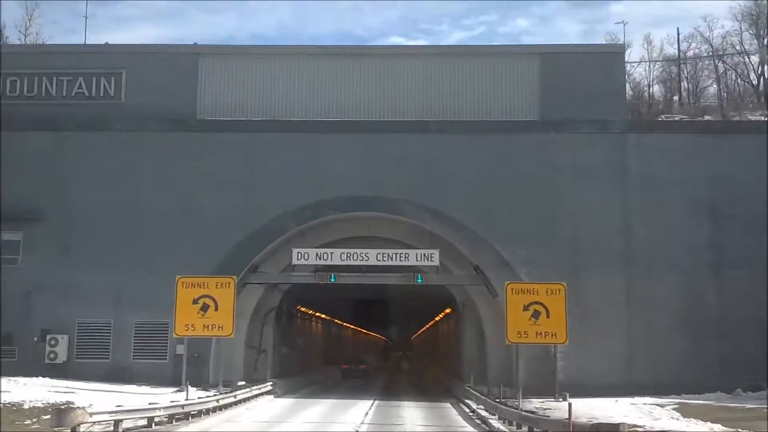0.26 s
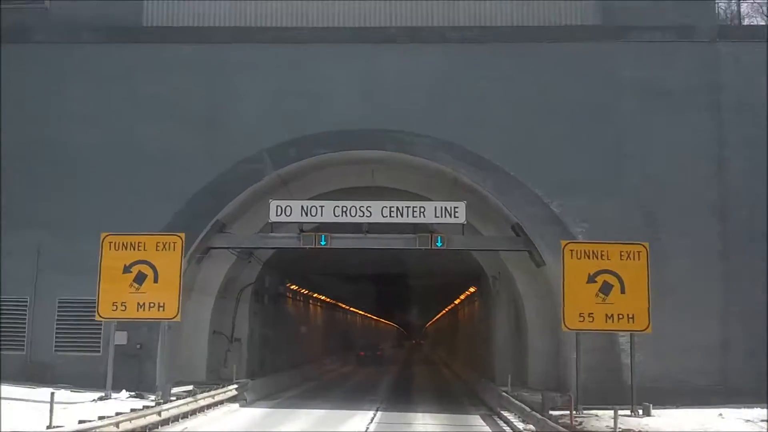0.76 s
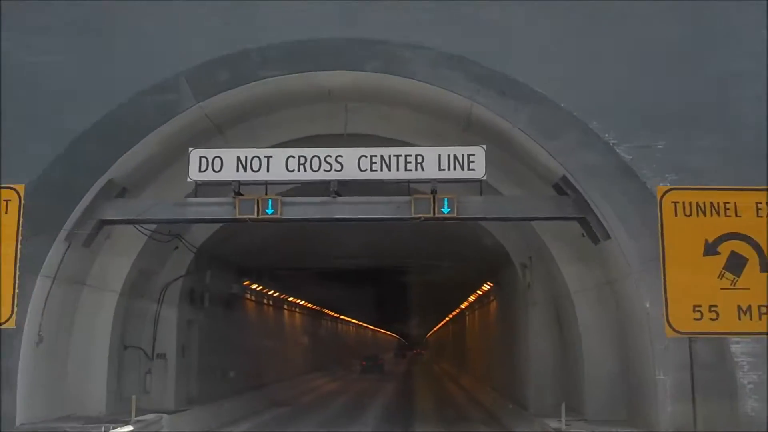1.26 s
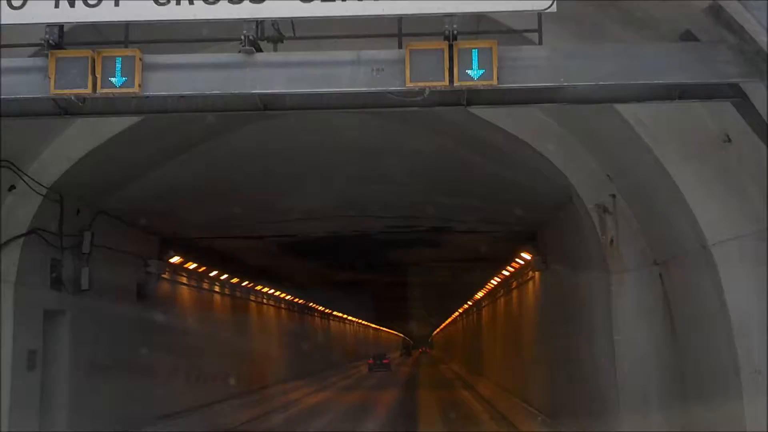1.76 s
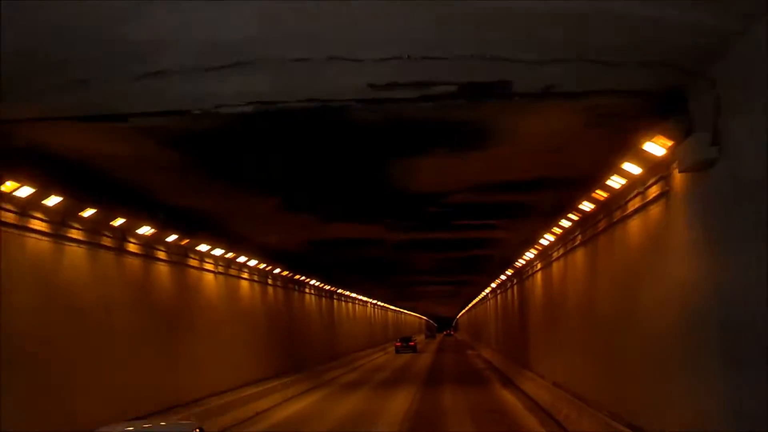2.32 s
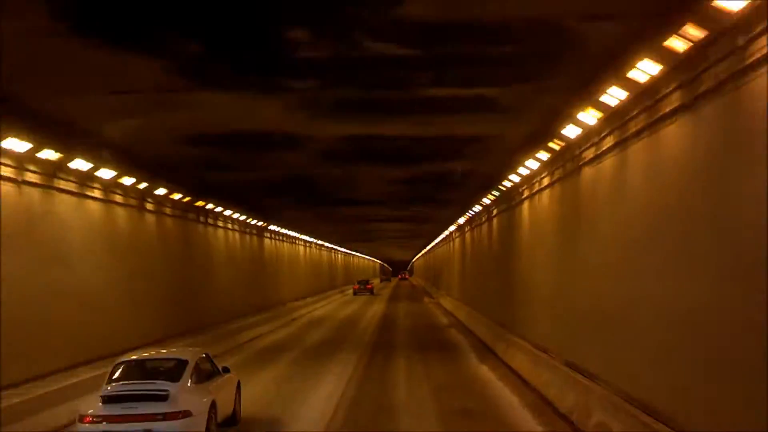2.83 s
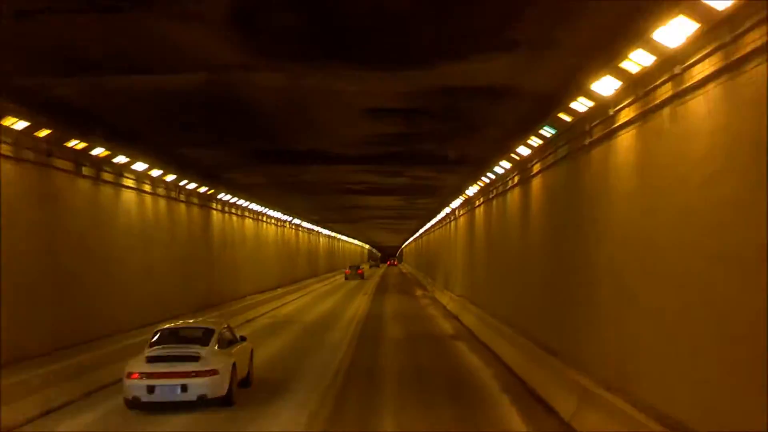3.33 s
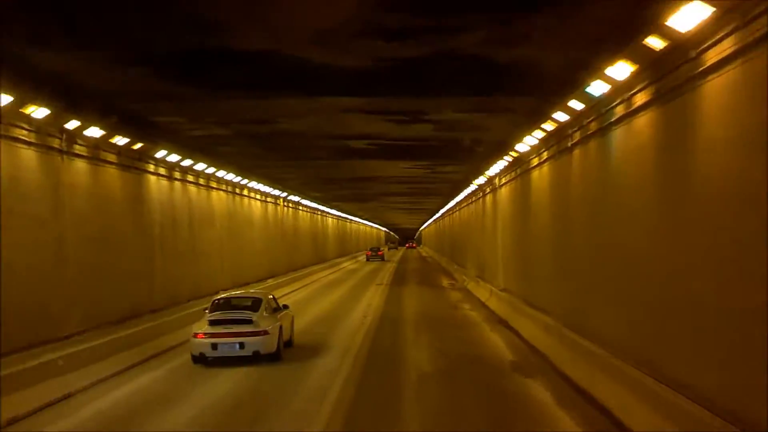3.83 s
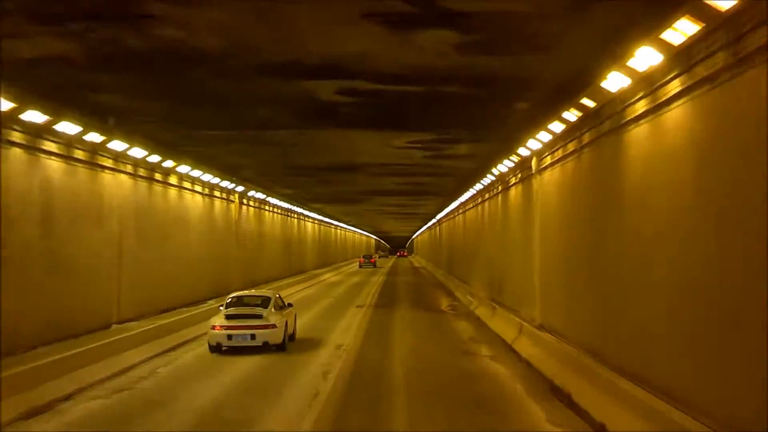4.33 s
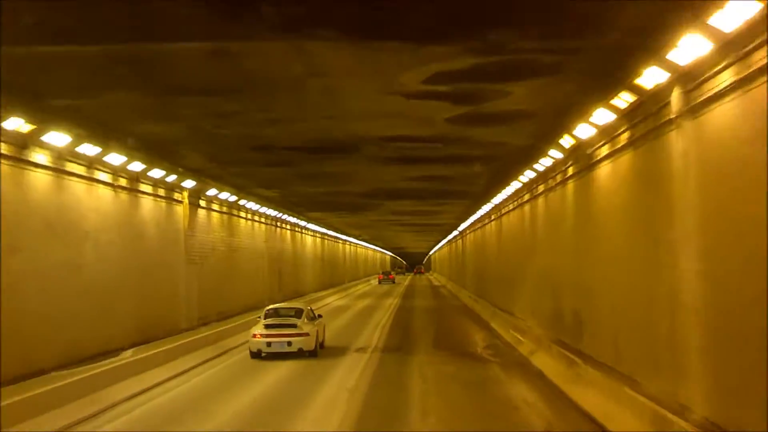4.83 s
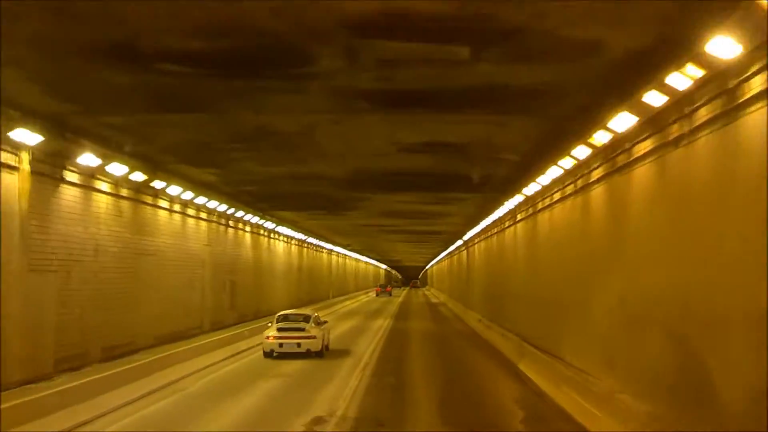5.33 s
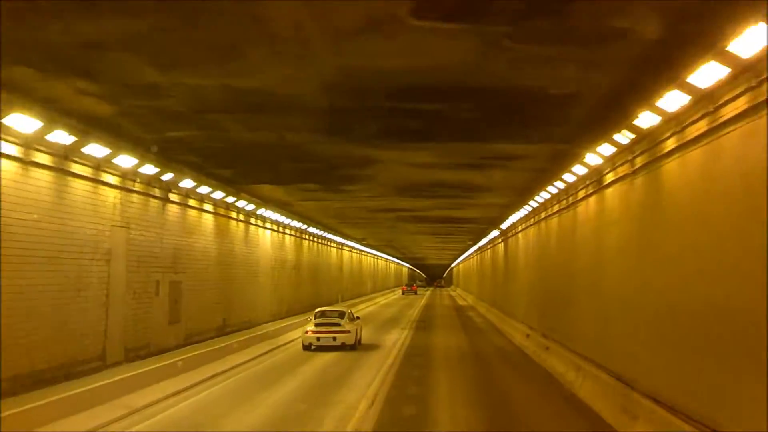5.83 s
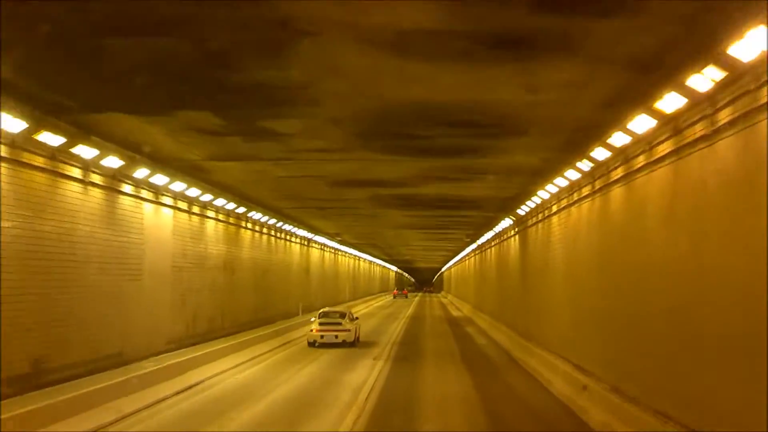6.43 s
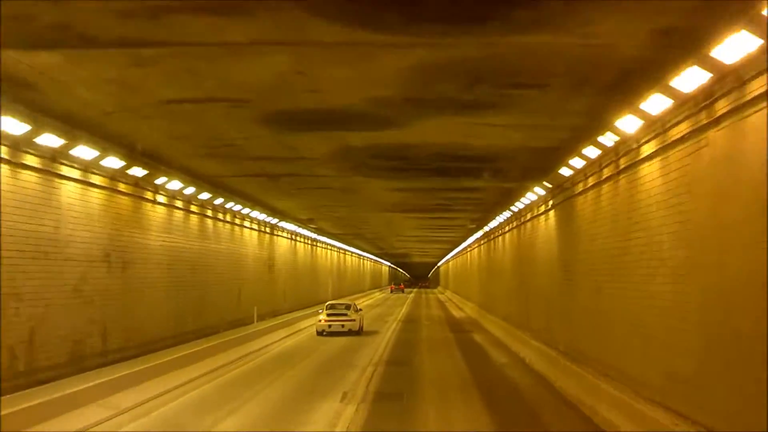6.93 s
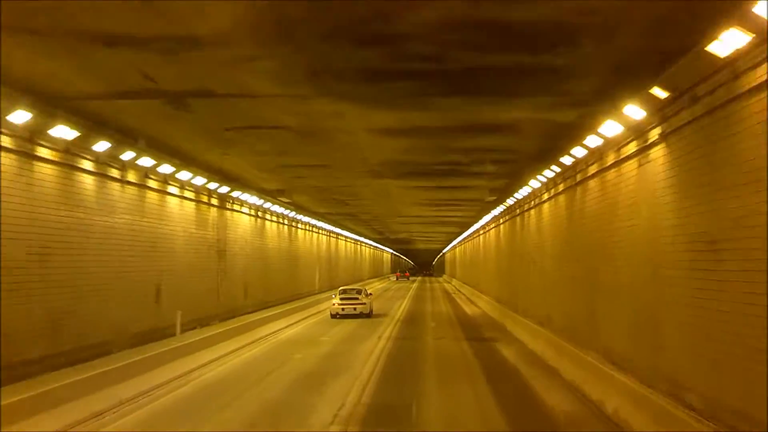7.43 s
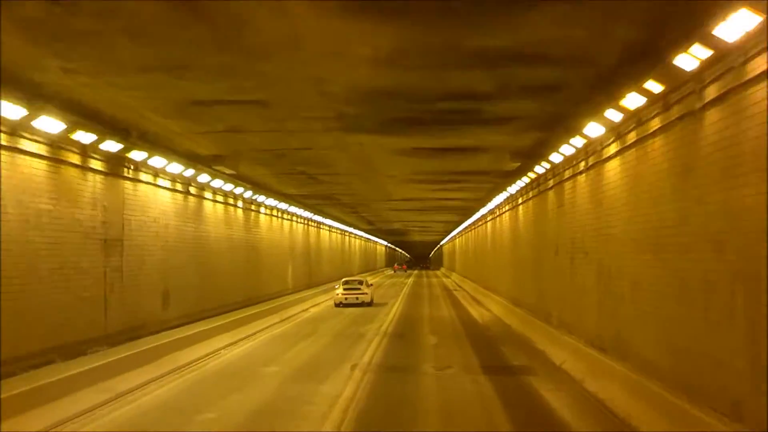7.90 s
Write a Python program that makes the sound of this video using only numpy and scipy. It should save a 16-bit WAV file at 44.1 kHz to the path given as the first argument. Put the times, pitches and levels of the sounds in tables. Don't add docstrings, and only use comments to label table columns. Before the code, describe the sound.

Cabin of a car at steady highway speed: deep booming body rumble, tyre roar, engine hum and faint air hiss, with small trim knocks at the start. Entering a tunnel around two seconds, the boom briefly dips and lurches, then roar and low exhaust drone fill out and hold to the end. Close, wide stereo microphone on the dashboard.

```python
import sys
import numpy as np
from scipy import signal
from scipy.fft import rfft, irfft, next_fast_len
from scipy.io import wavfile
from scipy.ndimage import uniform_filter1d, map_coordinates

SR = 44100
rng = np.random.default_rng(int(sys.argv[2]) if len(sys.argv) > 2 else 0)


def persist_wave(psi):
    counts = np.round(np.clip(psi, -1, 1) * 32767).astype(np.int16)
    wavfile.write(sys.argv[1], SR, np.atleast_2d(counts).T)


def field_ratio(decibels):
    return 10 ** (np.asarray(decibels, dtype=float) / 20)


N = 359856
TOP_HZ = 15800


def unit(x):
    return x / np.sqrt(np.mean(x ** 2) + 1e-20)


def along(points, hz):
    f, *cols = np.transpose(points)
    return [np.interp(np.log(hz + 1), np.log(f), c) for c in cols]


def curves(rows):
    s, *cols = np.transpose(rows)
    return [np.interp(np.arange(N) / SR, s, c) for c in cols]


def bumps(rows):
    t = np.arange(N) / SR
    return sum(db * np.exp(-((t - s) / length) ** 2) for s, db, length in rows)


def wobble(rate):
    knots = rng.standard_normal(int(N * rate / SR) + 4)
    return map_coordinates(knots, [np.arange(N) * rate / SR])


# f/Hz, difference over sum level/dB, in-step likeness, quarter-turn likeness
PORT_FIELD = [(50, -17, -.6, .2), (110, -27.5, 0.49, -0.53), (180, -16, 0.96, -0.18),
              (260, -8.5, 0.48, -0.34), (400, -6.5, -0.3, -0.083), (600, -7, -0.45, -.1),
              (770, -5, .1, -0.085), (1150, 1, -0.75, -0.045), (1890, 1.5, -0.31, 0.038),
              (2710, -4, 0.21, -0.11), (3700, 3, 0.54, 0), (5000, -2.5, .1, 0), (6300, 0.5, .45, 0.051),
              (12000, 0, -0.66, 0.061)]


def field(gain, patchy_db):
    z = signal.stft(rng.standard_normal((2, N)), nperseg=512)[2]
    patches = uniform_filter1d(rng.standard_normal(z.shape[1:]), size=6, axis=0)
    patches = uniform_filter1d(patches, size=12, axis=1)
    patchy = signal.istft(z * field_ratio(patchy_db * unit(patches)), nperseg=512)[1]
    m = next_fast_len(N + 8192)
    a, b = rfft(patchy, m)
    hz = np.fft.rfftfreq(m, 1 / SR)
    apart_db, in_step, quarter = along(PORT_FIELD, hz)
    alike = in_step + 1j * quarter
    unlike = np.sqrt(np.clip(1 - abs(alike) ** 2, 0, 1))
    other = field_ratio(apart_db) * (alike * a + unlike * b)
    pair = irfft(gain(hz) * np.array([a, other]), m)[:, :N]
    return pair / np.std(pair[0])


def coloured(table, patchy_db):
    return field(lambda hz: field_ratio(along(table, hz)[0]), patchy_db)


def tone(hz, db, apart_db, drift_hz, sign=1):
    turn = 2 * np.pi * np.cumsum(hz + drift_hz * wobble(6)) / SR + rng.uniform(0, 2 * np.pi)
    ports = np.sqrt(2) * np.array([[1], [sign * field_ratio(apart_db)]])
    return field_ratio(db) * np.sin(turn) * ports


# t/s, share of walls
TUNNEL = [
    (0, 0.018),
    (1.1, 0.065),
    (2.2, 0.55),
    (8.16, 0.83),
]


def between_walls(open_db, walled_db):
    share, = curves(TUNNEL)
    return open_db + share * (walled_db - open_db)


# t/s, roar level/dB
SURFACE_ROUGHNESS = [(0, -33.5), (.5, -34), (1.1, -32.5), (1.5, -34), (2.1, -33), (2.6, -30.5), (2.95, -33),
                     (3.35, -30.5), (3.95, -31), (4.3, -31), (4.8, -32), (5.15, -31.5), (5.4, -31.5),
                     (6.05, -30.5), (6.9, -31), (7.3, -32.5), (7.7, -30), (8.16, -33.5)]


def surface():
    db, = curves(SURFACE_ROUGHNESS)
    return db.mean(), db - db.mean()


# t/s, level/dB, length/s
BODY_HEAVES = [(.16, -3, .05), (.27, 4, 0.037), (.41, 3, 0.036), (.48, -2, 0.036), (1.05, -1.5, .15),
               (1.5, -1.5, .15), (1.95, 1.5, 0.055), (2.06, -2, .06), (2.26, 5.5, 0.056), (2.6, -0.5, .15),
               (3.3, 1.5, 0.22), (4.39, 2.5, 0.046), (4.6, -0.5, .1), (5.2, 2, .1), (5.33, -1, 0.032),
               (5.9, 0.5, .15), (6.4, -1, .1), (6.75, -3.5, .07), (7.1, 1, .1), (7.65, .7, .12)]


def heave():
    return bumps(BODY_HEAVES)


# f/Hz, level/dB
BOOM_COLOUR = [(20, -15), (38, -18.5), (48, -22), (62, -9.5), (85, -6), (105, 4.5), (125, 7), (150, 4),
               (190, 1.5), (215, -6), (260, -11), (400, -54.5), (900, -120)]


def body_boom():
    swing_db = surface()[1]
    arch_lull_db = bumps([(2.29, 3.5, 0.28)])
    db = -21 - arch_lull_db + 0.6 * heave() + 0.24 * swing_db
    return field_ratio(db) * coloured(BOOM_COLOUR, patchy_db=1.0)


# f/Hz, level/dB
ROAR_COLOUR = [(150, -53.5), (215, -3), (330, -3), (450, -10.5), (620, -10), (780, -13), (1000, -16),
               (1250, -18), (1470, -20.5), (1620, -24), (1900, -26.5), (2300, -29), (2800, -31.5),
               (4000, -86.5), (7000, -120)]


def tyre_roar():
    mean_db, swing_db = surface()
    return field_ratio(mean_db + swing_db + 0.6 * wobble(7)) * coloured(ROAR_COLOUR, patchy_db=0.5)


# f/Hz, width f/Hz, open road level/dB, tunnel level/dB, share of groove song
TREAD_TONES = [
    (407, 94, -37.5, -44.5, .1),
    (547, 34, -49, -43.5, .3),
    (883, 78, -50.5, -47.5, 0.75),
    (1721, 107, -57, -58.5, 0.3),
]
# t/s, level/dB
GROOVE_SONG = [(0, -4), (.6, -1.5), (1.0, 5), (1.32, 7), (1.55, 3.5), (2.2, 2), (3.0, -4), (4.2, 3.5),
               (4.6, 2.5), (5.1, 2), (6.2, 6), (7.0, 4.5), (8.16, 1)]
# t/s, level/dB, length/s
CAVITY_SWELLS = [
    (.5, 4, .3),
    (1.6, 1.5, .3),
    (3.4, 0.5, 0.22),
    (4.4, 3, .15),
    (5.17, 11.5, 0.11),
    (6.1, 4.5, .25),
    (7.0, 3, .3),
    (7.8, 0, .4),
]


def tread_tones():
    song_db, = curves(GROOVE_SONG)
    tones = 0
    for centre_hz, width_hz, open_db, walled_db, share in TREAD_TONES:
        db = between_walls(open_db, walled_db) + share * song_db
        if abs(centre_hz - 546) < 50:
            db = db + bumps(CAVITY_SWELLS)
        band = lambda hz: 1 / (1 + ((hz - centre_hz) / (width_hz / 2)) ** 2)
        tones = tones + field_ratio(db + 1.2 * wobble(3)) * field(band, patchy_db=0.4)
    return tones


# f/Hz, level/dB
GLASS_HISS = [(900, -92), (1800, -29), (2600, -1.5), (3200, -2), (3800, -5.5), (4300, -12), (5500, -20.5),
              (8000, -92.5)]
MIRROR_RUSH = [(2500, -88.5), (3600, -31), (4500, -11), (5200, 2.5), (6000, -0.5), (6700, -5), (7200, -11),
               (8500, -30), (11000, -91)]
SEAL_FIZZ = [(4000, -91), (6000, -24), (7200, -1.5), (8300, -2.5), (9000, -5.5), (10300, -8), (12000, -9),
             (13500, -7.5), (15000, -3.5), (15700, -4.5)]
# t/s, level/dB, length/s
AIR_PUFFS = [(0.228, 5.5, 0.036), (1.014, 0.5, 0.056), (1.33, 2, 0.081), (2, 2, 0.56), (4.83, 0, .05),
             (4.55, -1.5, .1), (3.45, 0, .06), (6.7, 2, 0.11), (6.28, 2.5, .06), (0.86, -2, .04),
             (.75, 2.5, .07), (8.1, 1, .06)]


def wind():
    swing_db = surface()[1]
    gust_db = 0.8 * wobble(11) + 0.3 * wobble(5) + bumps(AIR_PUFFS)
    hiss_db = between_walls(-57, -59.5) + 0.44 * swing_db + 0.7 * gust_db
    rush_db = between_walls(-65.5, -65.5) + 0.82 * swing_db + gust_db
    fizz_db = between_walls(-70, -73.5) + 0.58 * swing_db + 0.7 * gust_db + wobble(25)
    hiss = field_ratio(hiss_db) * coloured(GLASS_HISS, patchy_db=0.87)
    rush = field_ratio(rush_db) * coloured(MIRROR_RUSH, patchy_db=1.5)
    fizz_gain = lambda hz: field_ratio(along(SEAL_FIZZ, hz)[0]) * (hz < TOP_HZ)
    return hiss + rush + field_ratio(fizz_db) * field(fizz_gain, patchy_db=1.1)


def buffet(pair):
    band = signal.butter(1, (800, 4500), "band", fs=SR, output="sos")
    middle = signal.sosfiltfilt(band, pair)
    shake_db = 1.1 * unit(wobble(9) + wobble(18))
    return pair + (field_ratio(shake_db) - 1) * middle


# t/s, shaft turn rate f/Hz
SHAFT_SPEED = [(0, 19.2), (4, 19.5), (8.16, 19.25)]
# multiple, open road level/dB, tunnel level/dB, port difference level/dB
SHAFT_ORDERS = [(4, -41, -51.5, -29), (5, -39, -44.5, -22), (6, -34, -39.5, -27), (7, -26, -29.5, -23),
                (7.75, -34.5, -38, -19), (9.45, -43.5, -35.5, -15), (10, -36.5, -30.5, -18.5),
                (14.4, -41.5, -46.5, -5.5)]
# start t/s, end t/s, f/Hz, level/dB, port difference
# level/dB
EXHAUST_DRONES = [
    (0.2, 4.63, 174, -33.5, -19),
    (4.7, 8.6, 172, -31, -17),
    (2.5, 2.96, 490, -38, -5),
    (6.6, 9.3, 232.5, -44, -9),
]


def drivetrain():
    shaft_hz, = curves(SHAFT_SPEED)
    hum = 0
    for multiple, open_db, walled_db, apart_db in SHAFT_ORDERS:
        db = between_walls(open_db, walled_db) + 2.1 * wobble(9)
        hum = hum + tone(multiple * shaft_hz, db, apart_db, drift_hz=2.3)
    firing = tone(49.05, -37 + 2.4 * wobble(5), -22, drift_hz=0.5, sign=-1)
    t = np.arange(N) / SR
    swell_s = 0.76
    for start, end, hz, db, apart_db in EXHAUST_DRONES:
        swell = np.clip(np.minimum(t - start, end - t) / swell_s, 0, 1)
        hum = hum + swell * tone(hz, db + 1.84 * wobble(5), apart_db, drift_hz=1.365)
    return field_ratio(heave()) * hum + firing


# t/s, top peak level/dB, bright part level/dB, dull part level/dB, 60 dB decay t/s
TRIM_TICKS = [
    (0.0064, -50, 3, 11, 0.079),
    (0.0338, -39.5, 0, 2.5, 0.04),
    (1.039, -42, -7, 1, 0.03),
    (1.951, -53, -6, 5, 0.085),
    (5.2333, -57, 1, 10.5, 0.065),
    (5.241, -60, 0, 13, 0.04),
    (7.002, -51.5, -8, -1, 0.04),
    (7.6166, -49, -14, -5, 0.1),
    (8.0167, -53, -12, -1, 0.069),
]
# t/s, peak level/dB
TRIM_SOFT_TICKS = [(0.1451, -49), (0.4618, -55), (0.52, -50), (0.598, -61), (0.6419, -57), (1.6197, -53),
                   (1.709, -55.5), (3.166, -54.5), (3.9389, -60), (5.5146, -57.5), (5.689, -56), (6.178, -53),
                   (6.8902, -54), (7.1033, -57)]


def dashboard():
    out, t = np.zeros((2, N + SR)), np.arange(SR // 8) / SR
    bands = [3000, 7500], [7000, 13000], [13000, 17000]
    low, mid, top = [signal.butter(3, edges, "band", fs=SR, output="sos") for edges in bands]
    soft_ticks = [(s, db - 3.5, -7, 1, 0.07) for s, db in TRIM_SOFT_TICKS]
    for s, db, bright_db, dull_db, t60 in TRIM_TICKS + soft_ticks:
        decay = field_ratio(-60 * t / t60) + 0.87 * field_ratio(-60 * t / 0.0096)
        attack = 1 - np.exp(-t / 0.00051)
        burst = rng.standard_normal((2, len(t))) * decay * attack
        dull = field_ratio(dull_db - 1.5) * signal.sosfilt(low, burst)
        bright = field_ratio(bright_db + 1.0) * signal.sosfilt(mid, burst)
        parts = dull + bright + signal.sosfilt(top, burst)
        out[:, round(s * SR):][:, :len(t)] += field_ratio(db) * parts
    return out[:, :N]


# t/s, level/dB, low edge f/Hz, high edge f/Hz, left
# minus right level/dB
SHARP_SNAPS = [(0.0356, -25, 13500, 17000, -1), (0.1456, -40, 11000, 17000, 0.1),
               (0.4618, -45, 11000, 17000, 0.1), (0.5197, -45, 6500, 14000, 0.1),
               (0.6595, -43, 13000, 17000, 0.1), (1.0403, -29, 14000, 17000, -2),
               (1.8053, -37, 7500, 15000, -14), (2.7782, -19.5, 3300, 4800, -7.5),
               (2.7778, -27, 14000, 17000, -7.5), (5.2335, -49, 7000, 17000, 0.1),
               (7.0024, -31, 13800, 17000, 0.1)]


def sharp_snaps():
    out = np.zeros((2, N + 256))
    for s, db, low_hz, high_hz, lean_db in SHARP_SNAPS:
        high_pass = signal.butter(2, low_hz, "high", fs=SR, output="sos")
        click = signal.sosfilt(high_pass, signal.unit_impulse(256))
        click = signal.lfilter(*signal.butter(2, high_hz, fs=SR), click)
        sides = field_ratio(db + np.array([[lean_db / 2], [-lean_db / 2]]))
        out[:, round(s * SR):][:, :len(click)] += sides * click
    return out[:, :N]


def preamp_hiss():
    band = signal.butter(2, (2200, 4500), "band", fs=SR, output="sos")
    return field_ratio(-76) * unit(signal.sosfilt(band, rng.standard_normal((2, N))))


# f/Hz, level/dB
DROPOUT_MARGIN = [(1000, 29), (2300, 17), (2590, 12.3), (2840, 21), (4000, 11.5), (5200, 11.5), (5800, 15),
                  (7000, 16.0), (8500, 5.6), (12000, 7), (14000, 5), (15000, 7.5)]
# t/s, level/dB
NOTCH_DROPOUT = [(0, 6), (.58, 8), (.7, -.5), (2.0, .8), (2.7, -2.5), (2.95, 3), (3.9, .4), (4.7, -2),
                 (5.0, 3), (5.5, -.5), (6.3, 1.5), (7.0, 4), (8.16, 4.5)]


def drop_faint_bands(pair):
    centre_sides = [pair[0] + pair[1], pair[0] - pair[1]]
    hz, t, z = signal.stft(centre_sides, SR, nperseg=2048, boundary="even")
    edges = np.r_[0:96:8, 96:144:12, 144, 160, 176, 196, 216, 240, 264, 292, 320:len(hz):16]
    bands = np.searchsorted(edges, np.arange(len(hz)), "right") - 1
    power = np.add.reduceat(abs(z) ** 2, edges, axis=1)[:, bands]
    total = power.sum(axis=0)
    usual = np.median(total, axis=1, keepdims=True)
    recent = field_ratio(uniform_filter1d(10 * np.log10(total + 1e-20), size=9, axis=1)) ** 2
    usual = np.sqrt(usual * recent)
    flicker = uniform_filter1d(rng.standard_normal((len(edges), z.shape[2])), size=3, axis=1)[bands]
    in_notch = ((hz > 5100) & (hz < 5700))[:, None]
    notch_db = np.interp(t, *np.transpose(NOTCH_DROPOUT)) * in_notch
    margin_db = along(DROPOUT_MARGIN, hz[edges][bands])[0][:, None]
    threshold = usual * field_ratio(2.5 * unit(flicker) + notch_db - margin_db) ** 2
    treble = power[:, hz > 8000].sum(axis=(0, 1))
    sudden = treble > 2.3 * signal.medfilt(np.pad(treble, 7, "reflect"), 15)[7:-7]
    sudden[-3:] = False
    faint = (abs(z) ** 2 < 0.9 * power / 16) & (hz > 7000)[:, None]
    keep = ((power > threshold) & ~faint | sudden) * (hz < TOP_HZ)[:, None]
    mid, side = signal.istft(z * keep, SR, nperseg=2048)[1][:, :N]
    return np.array([mid + side, mid - side]) / 2


# t/s, level/dB, length/s
ROAD_PATCHES = [(.3, -1, 0.034), (.59, -1, .1), (1.0, 2, 0.043), (1.33, 2.5, 0.054), (1.55, 0.5, 0.015),
                (2.55, -1, 0.079), (2.8, 1.5, 0.095), (5.7, -0.5, .12), (2.05, -1.6, 0.074),
                (2.93, 0, 0.074), (3.17, 1, 0.043), (3.63, 2, 0.051), (3.75, 1, 0.038), (4.28, -1.5, 0.087),
                (4.4, 1, .05), (4.72, -0.7, 0.089), (5.2, 0.6, .08), (5.34, -2, 0.076), (6.34, -0.7, .15),
                (6.73, -1.5, .04), (7.22, -0.2, 0.15), (3.85, -0.4, 0.087), (7.35, -1.2, .06),
                (7.79, -0.5, 0.11)]


def scene():
    rush = body_boom() + tyre_roar() + tread_tones() + wind()
    car = drivetrain() + dashboard()
    both, apart = field_ratio(bumps(ROAD_PATCHES)) * buffet(rush) + car
    return np.array([both + apart, both - apart])


def roll_off(x):
    return signal.sosfilt(signal.butter(12, 15800, fs=SR, output="sos"), x)


def record(dry):
    lag = 16
    late = np.pad(dry[::-1], ((0, 0), (lag, 0)), "edge")[:, :N]
    wide = dry - late + preamp_hiss() + sharp_snaps()
    mix = drop_faint_bands(wide)
    return roll_off(mix)


dry = scene()
out = record(dry)
persist_wave(out)
```